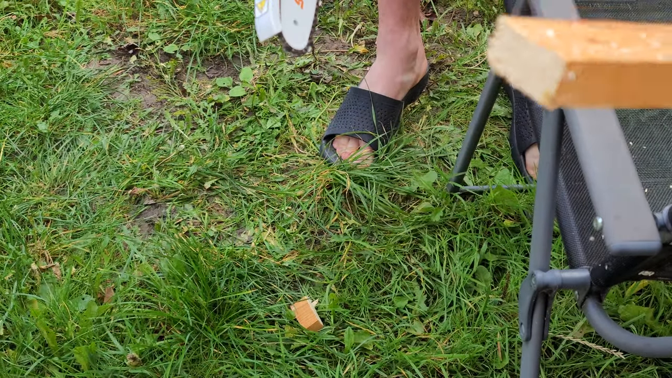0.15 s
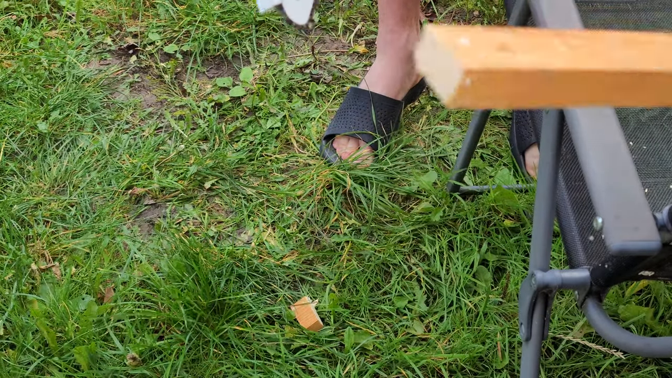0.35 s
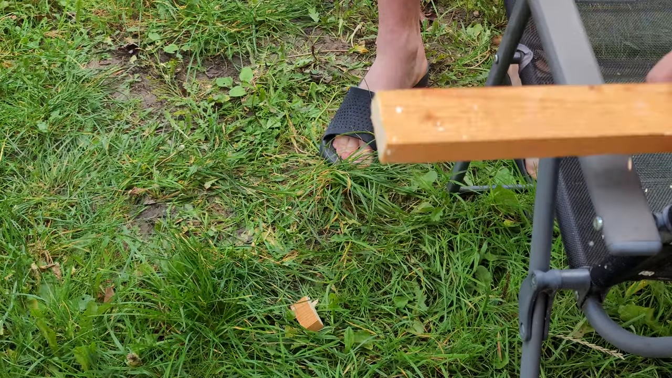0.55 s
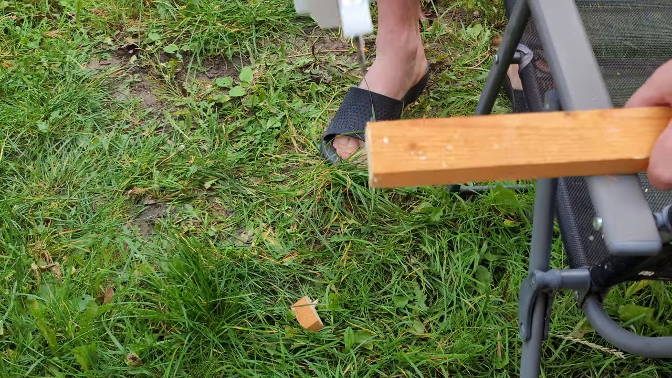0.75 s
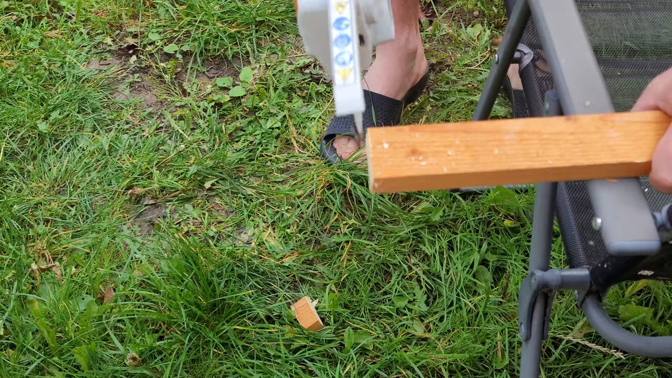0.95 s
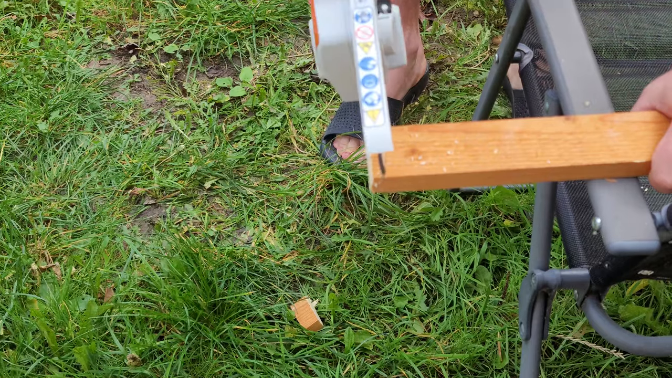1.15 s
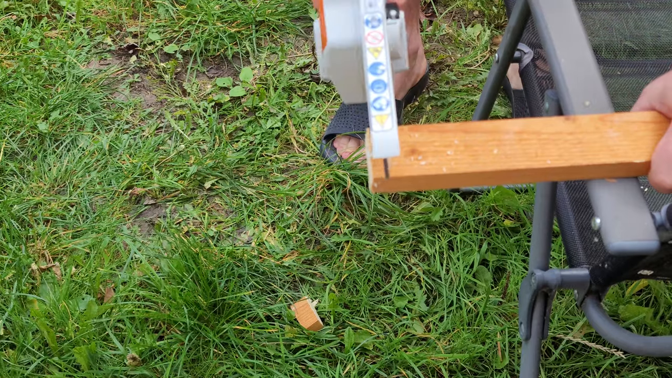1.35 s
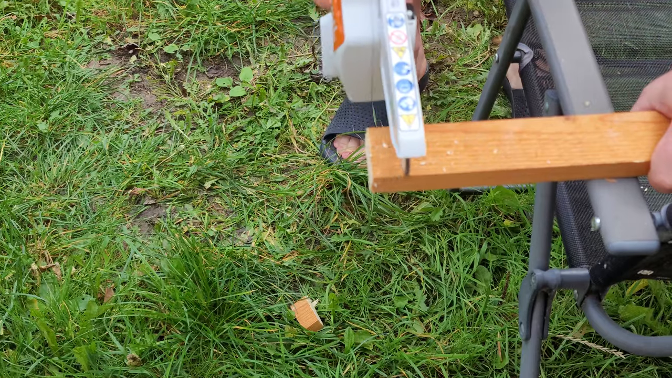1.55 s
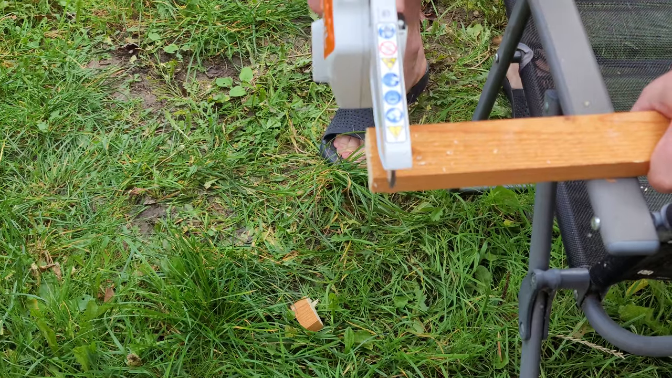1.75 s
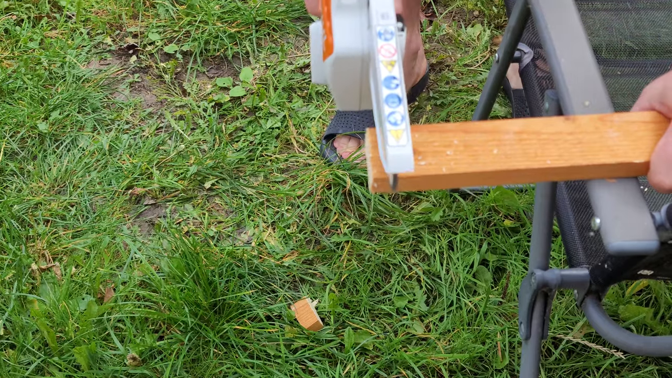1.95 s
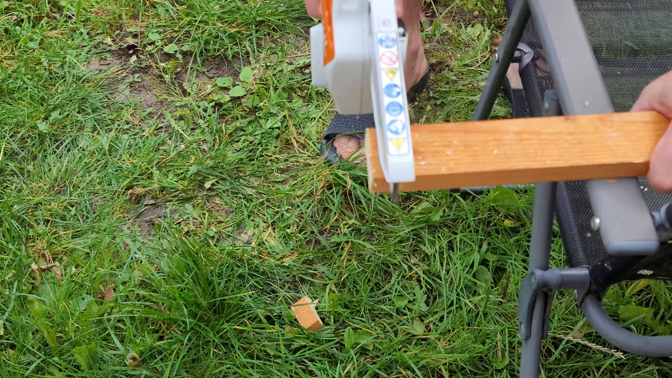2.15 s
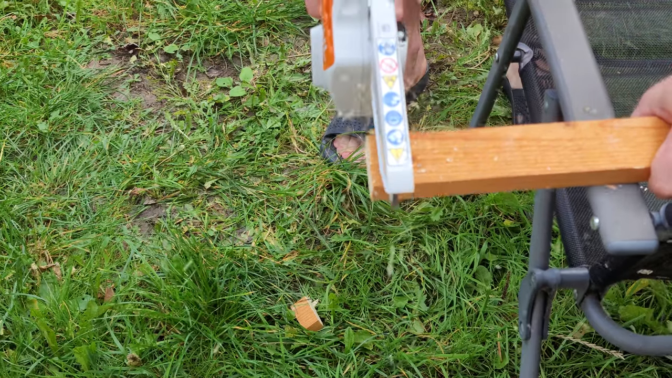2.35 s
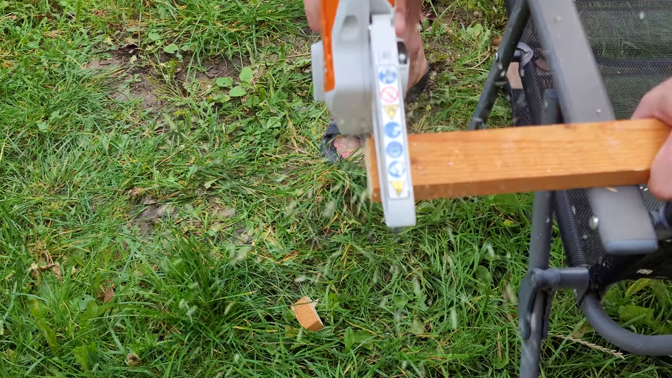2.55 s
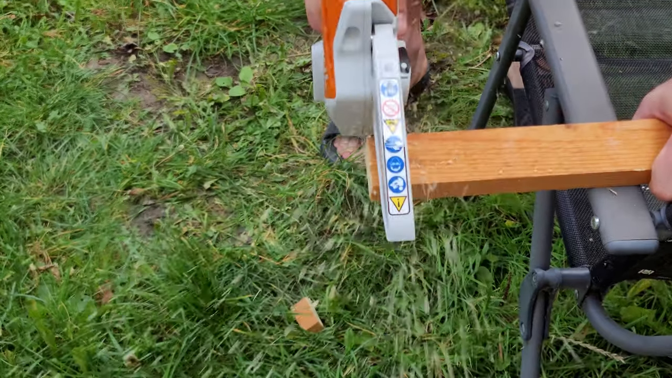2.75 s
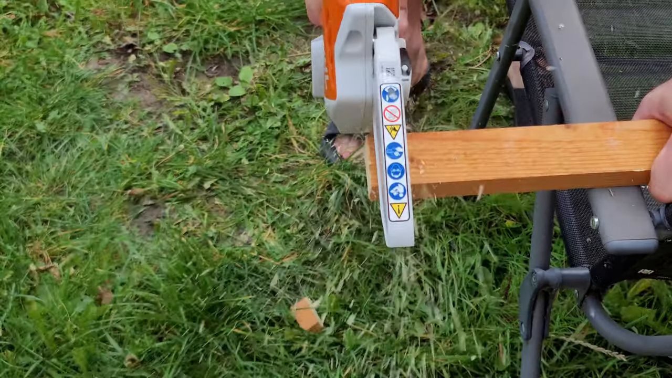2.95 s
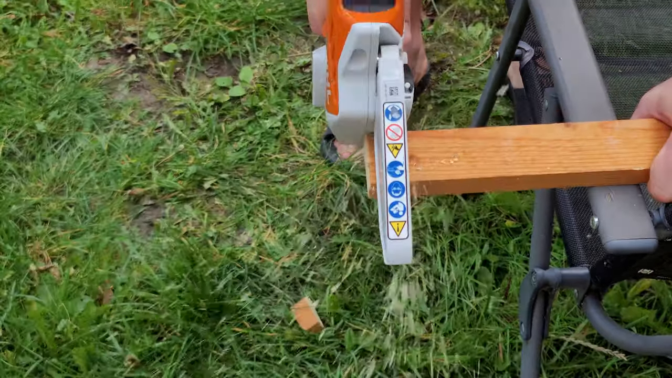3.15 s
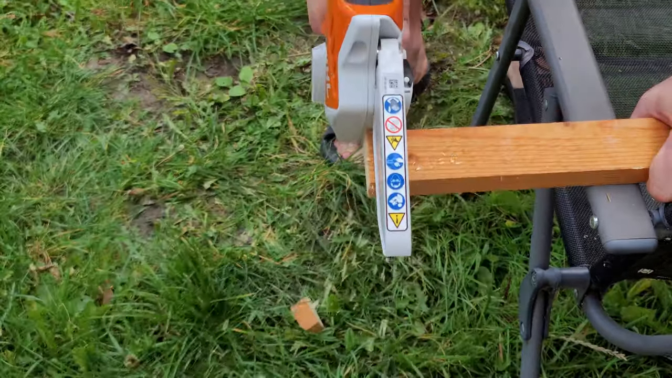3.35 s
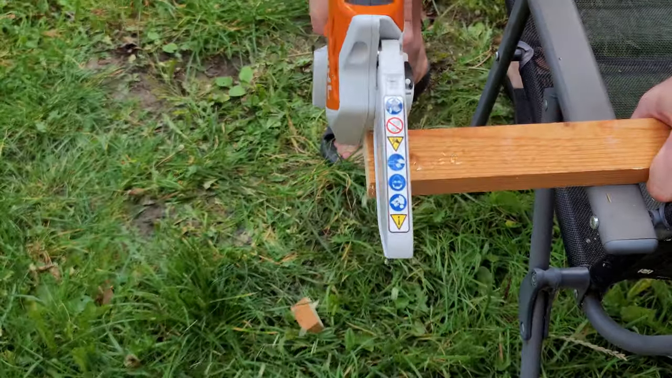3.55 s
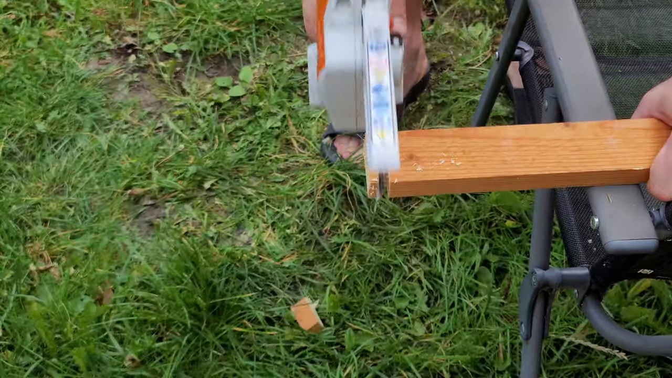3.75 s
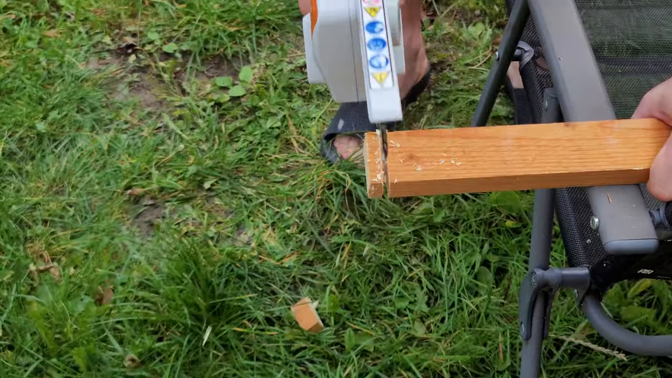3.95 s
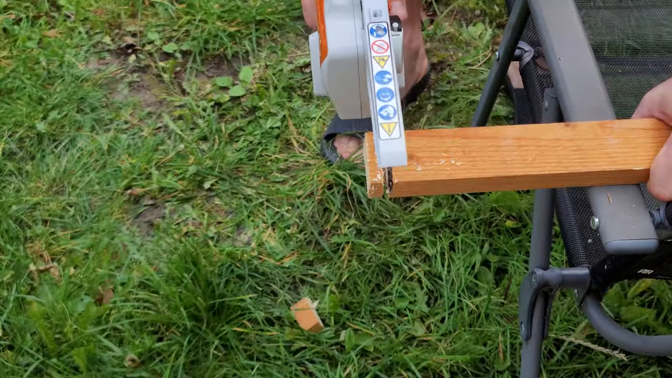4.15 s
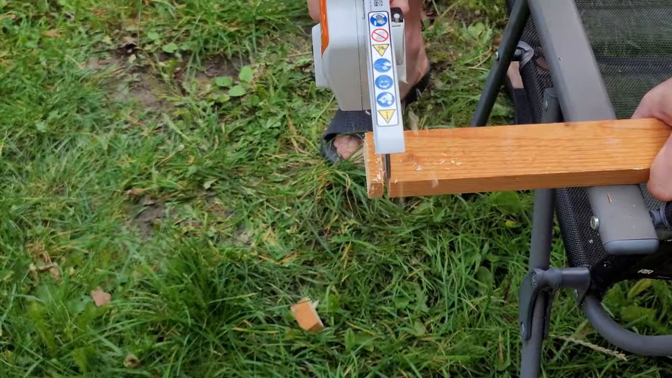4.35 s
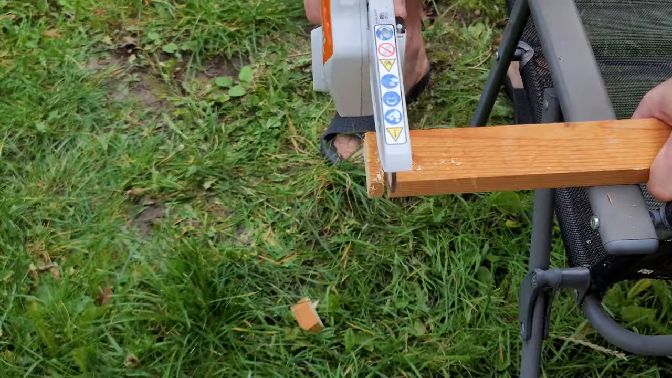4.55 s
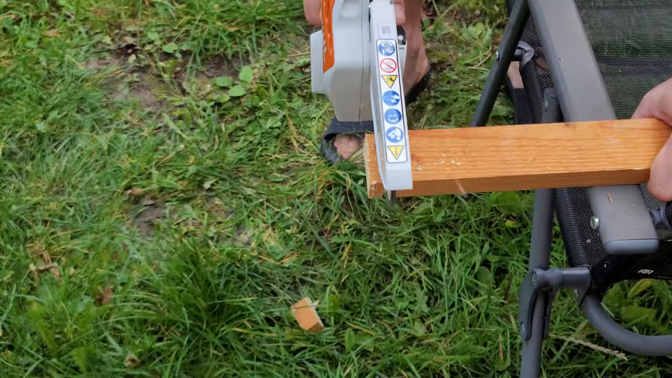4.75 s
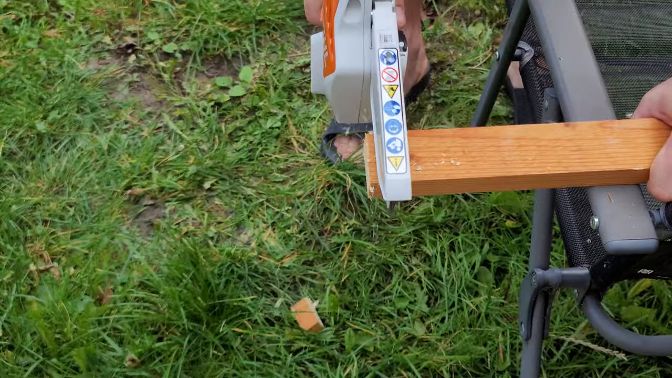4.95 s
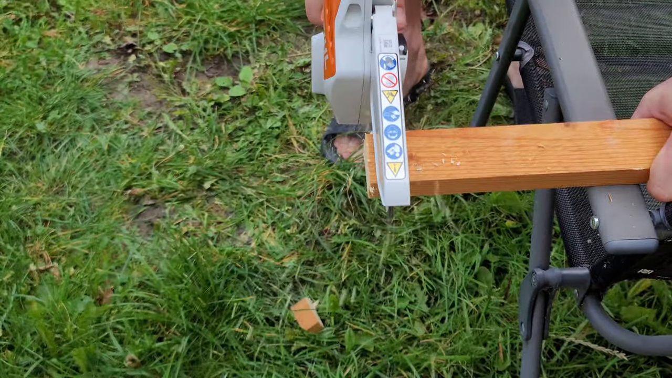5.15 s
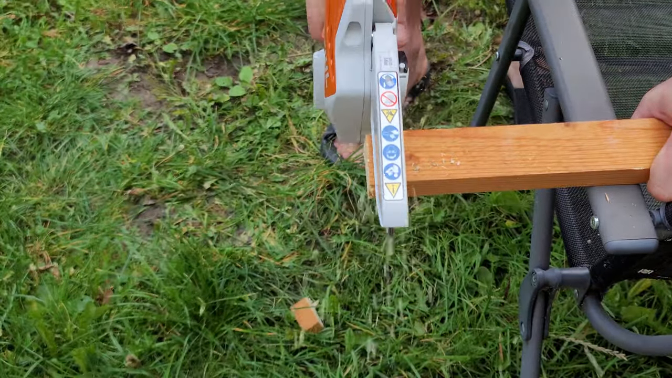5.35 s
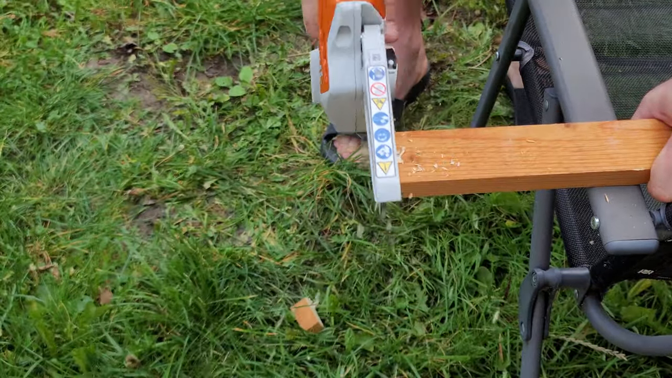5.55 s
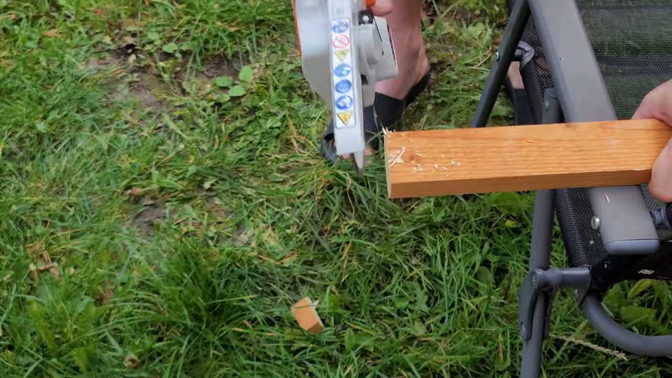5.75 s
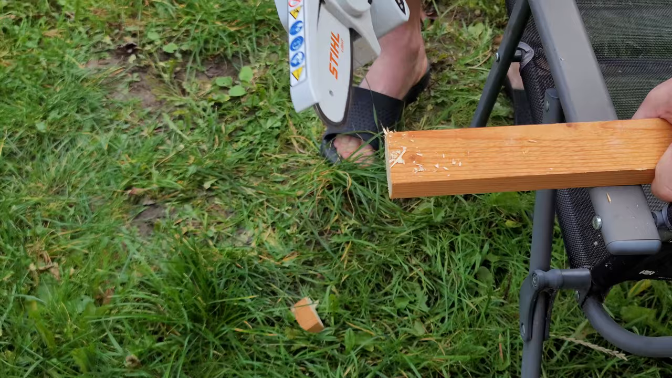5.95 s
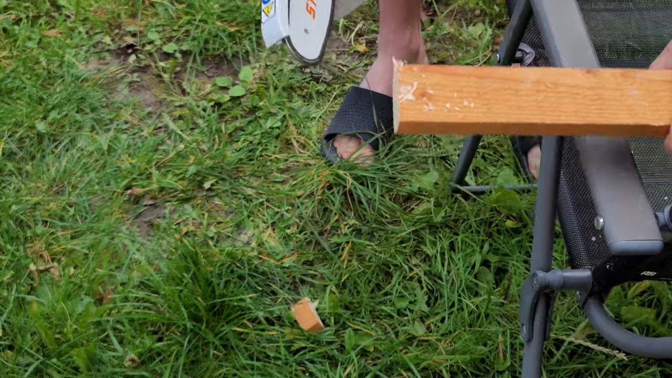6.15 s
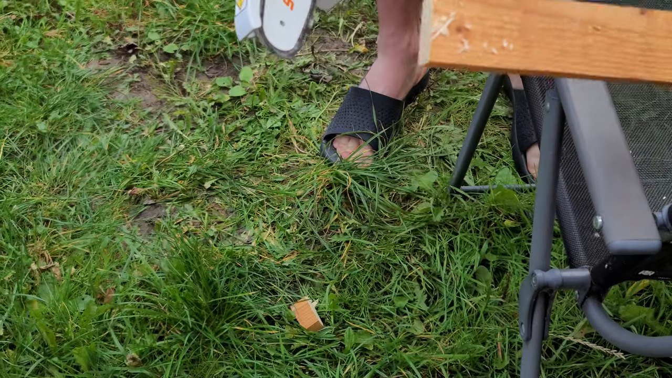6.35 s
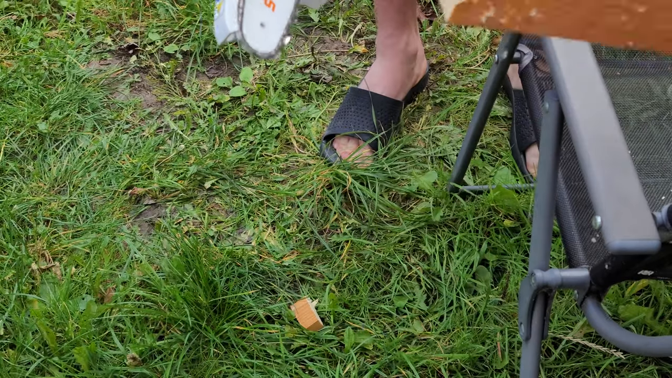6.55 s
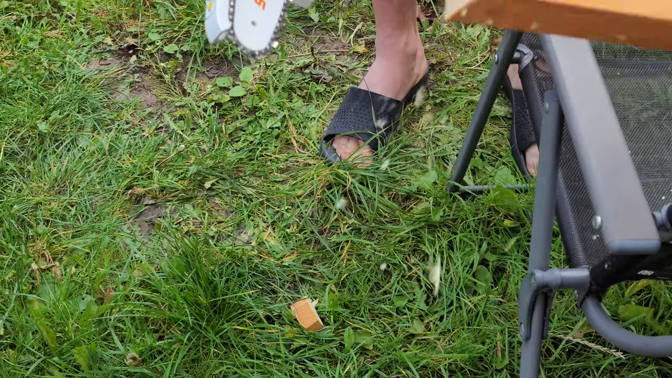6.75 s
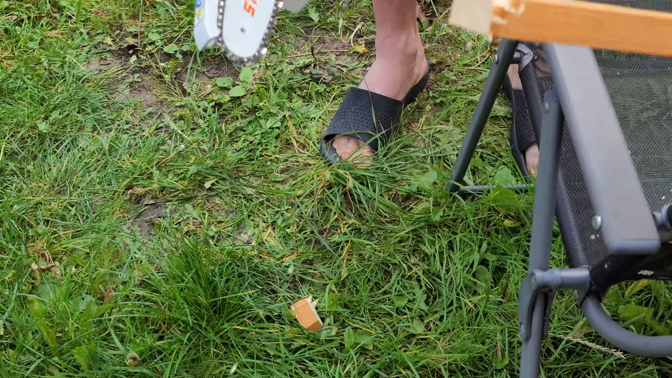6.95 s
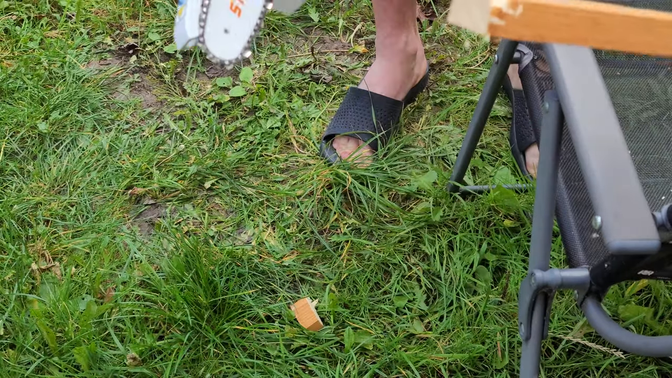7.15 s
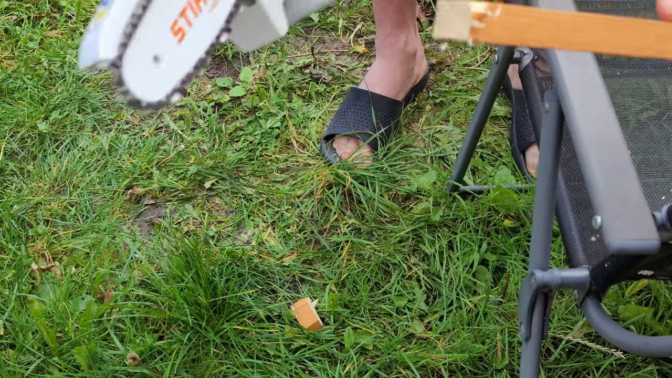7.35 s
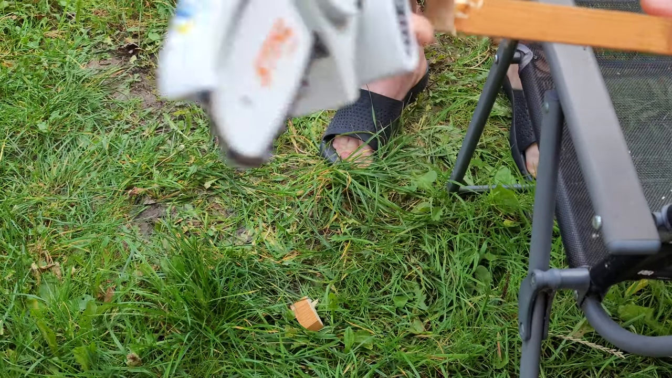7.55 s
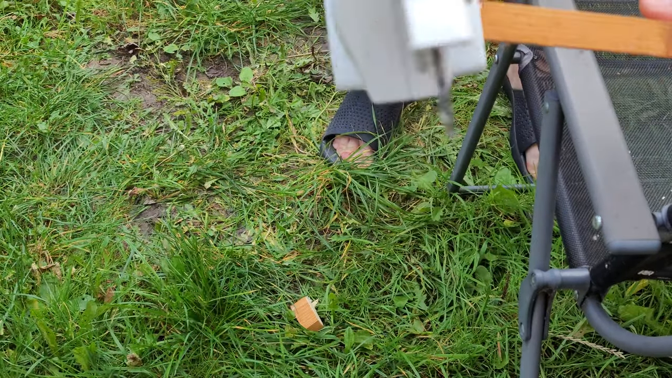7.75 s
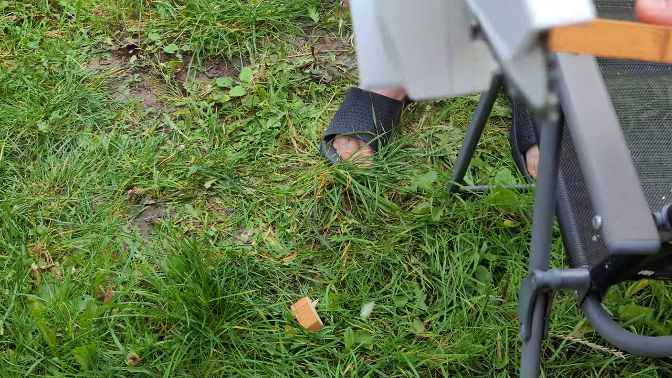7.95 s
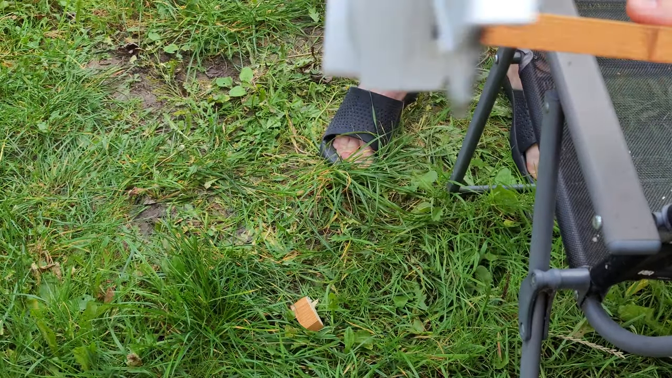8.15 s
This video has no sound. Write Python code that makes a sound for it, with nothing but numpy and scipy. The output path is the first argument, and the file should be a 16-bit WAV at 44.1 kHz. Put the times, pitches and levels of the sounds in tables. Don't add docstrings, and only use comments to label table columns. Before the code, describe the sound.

Over leafy hush and wind thumps, a battery saw buzzes, bogs down and stalls in wood, restarts in short touches, then rattles to a stop.

```python
import sys
import numpy as np
from scipy import signal
from scipy.fft import rfft, irfft, next_fast_len
from scipy.io import wavfile
from scipy.ndimage import uniform_filter1d, map_coordinates

SR = 44100
rng = np.random.default_rng(int(sys.argv[2]) if len(sys.argv) > 2 else 0)


def dump_mix(stems):
    frames = np.atleast_2d(stems).T
    limited = np.clip(frames, -1, 1)
    pcm = np.round(limited * 32767).astype(np.int16)
    wavfile.write(sys.argv[1], SR, pcm)


def boost(x):
    u = np.asarray(x, float) / 20
    return 10 ** u


N = 360738
TIME = np.arange(N) / SR


def unit(x):
    return x / np.sqrt(np.mean(x ** 2) + 1e-20)


def along(points, hz):
    f, v = np.transpose(points)
    return np.interp(np.log(hz + 1), np.log(f + 1), v)


def curve(rows):
    return np.interp(TIME, *np.transpose(rows))


def wobble(rate):
    coarse = np.arange(0, N + 64, 64)
    knots = rng.standard_normal(int(N * rate / SR) + 4)
    return np.interp(np.arange(N), coarse, map_coordinates(knots, [coarse * rate / SR]))


def bell(x, centre, width):
    return np.exp(-((x - centre) / width) ** 2)


def filtered(x, response):
    m = next_fast_len(N + SR // 2)
    return irfft(rfft(x, m) * response(np.fft.rfftfreq(m, 1 / SR)), m)[..., :N]


def spread(pair, spectrum, alike):
    def shares(hz):
        turn = np.arccos(np.clip(along(alike, hz), -1, 1)) / 2
        return spectrum(hz) * [np.cos(turn), np.sin(turn)]

    mid, side = filtered(pair, shares)
    return np.array([mid + side, mid - side])


def in_band(x, low_hz, high_hz, where):
    part = filtered(x.mean(axis=0), lambda hz: (hz > low_hz) & (hz < high_hz))
    return x / np.sqrt(np.mean(part[where] ** 2))


# (frequency [Hz], density [dB per Hz])
HUSH_COLOUR = [(25, -6), (48, 12), (80, -2.5), (150, -1.5), (300, -1.5), (600, -1.5), (900, -8.5),
               (1500, -7.5), (3000, -10.5), (6800, -9), (8500, -11), (9000, -21), (13000, -17.5),
               (16000, -27.5)]
# (frequency [Hz], likeness [-1 to 1])
HUSH_ALIKE = [(60, 1), (180, 1), (550, 0.059), (1650, -0.24), (4970, -0.027), (15000, 0.15)]
# (time [s], level [dB])
HUSH_LEVEL = [(0, -61), (1.05, -58), (3.33, -56.5), (3.6, -56.5), (3.8, -55), (4.15, -56), (6.6, -59),
              (7.3, -60.5), (8.18, -60)]


def hush():
    air = spread(rng.standard_normal((2, N)), lambda hz: boost(along(HUSH_COLOUR, hz)), HUSH_ALIKE)
    level = boost(curve(HUSH_LEVEL) + .7 * wobble(6))
    return level * in_band(air, 4000, 9000, slice(None))


# (time [s], length [s], start pitch [Hz], end pitch [Hz], level [dB])
BIRD_NOTES = [
    (7.257, 0.033, 4300, 4100, -60),
    (7.287, 0.034, 4200, 4350, -62),
    (7.313, 0.033, 2340, 2310, -53.5),
]


def bird():
    out = np.zeros(N)
    for s, length, hz, end_hz, db in BIRD_NOTES:
        u = np.clip((TIME - s) / length, 0, 4)
        swell = u ** .5 * np.exp(-1.6 * u) * (u < 4)
        cycles = length * (hz * u + (end_hz - hz) * u * u / 2)
        out += boost(db + 12.5 + 3.8 * wobble(150)) * swell * np.sin(2 * np.pi * cycles)
    return out


# (frequency [Hz], density [dB per Hz])
WIND_COLOUR = [(12, -33.5), (20, -8), (43, 6.5), (80, 4), (179, -21.5), (380, -32), (400, -31),
               (520, -61.5), (880, -120)]


def rumble():
    lumps = boost(7.6 * np.array([wobble(25), wobble(22)]))
    out = filtered(rng.standard_normal((2, N)) * lumps, lambda hz: boost(along(WIND_COLOUR, hz)))
    return out / np.sqrt(uniform_filter1d(out ** 2, size=SR // 12) + 1e-12)


# (time [s], level [dB])
LULL = [(0, -60), (.9, -52), (1.5, -61), (1.9, -60), (2.6, -65), (2.8, -51), (3.5, -47), (4, -55), (5, -50),
        (5.15, -69), (5.6, -52), (6, -57), (6.5, -55), (6.95, -65), (8.18, -61)]
# (time [s], peak level [dB], left over right [dB], time to swell or fall 20 dB [s])
GUSTS = [(.13, -32, -30, 0.12), (.25, -34, -31, 0.15), (.63, -35, -28, .08), (.73, -33, -25, 0.1),
         (.93, -28.5, -35, 0.14), (1.069, -38, -29, 0.1), (1.25, -38, -21, 0.05), (1.39, -32.5, -33, 0.09),
         (1.53, -41.5, -20, 0.17), (2.14, -39, -15, 0.03), (2.73, -26.5, -32, 0.05), (2.89, -31, -25, 0.1),
         (3.14, -30, -27, 0.09), (3.51, -37, -14.5, 0.1), (3.87, -39.5, -9, 0.18), (4.01, -60, -16, 0.8),
         (4.149, -33.5, 7, 0.04), (4.27, -40, -7, 0.13), (4.44, -32, -26, 0.06), (4.67, -32, 8, 0.08),
         (4.8, -39, 15, 0.1), (4.9, -36, -15, 0.13), (5.47, -35.5, -27, 0.23), (6.06, -31.5, -1, 0.02),
         (6.24, -37.5, -27, 0.11), (6.47, -49, 17, 0.2), (6.79, -47, 15, 0.1), (7.5, -47, 9, 0.1)]


def gust_level():
    step = TIME[::64]
    level = boost(np.interp(step, *np.transpose(LULL)) - 4.5) * np.ones((2, 1))
    for s, db, pan_db, swell in GUSTS:
        balance = np.array([[boost(pan_db)], [1]]) / np.sqrt(1 + boost(2 * pan_db))
        level = level + boost(db - 20 * np.abs(step - s) / swell) * balance
    return boost(3.5) * np.array([np.interp(TIME, step, port) for port in level])


# (time [s], peak level [dB])
POPS = [
    (0.108, -25),
    (0.864, -33),
    (0.933, -39),
    (1.383, -29.5),
    (4.439, -37),
    (5.418, -31),
    (5.759, -46),
    (6.07, -58),
]


def pops():
    out = np.zeros(N)
    for s, db in POPS:
        u = (TIME - s - .004) / 0.0014
        out -= boost(db + 10.0) * u * np.exp(-u * u / 2)
    return out


def wind():
    return gust_level() * rumble() + np.array([np.zeros(N), pops()])


def add(out, s, db, hz, t60, rustle, rustle_hz, rough=0.76):
    t = np.arange(SR // 5) / SR
    noise = rng.standard_normal((3, len(t)))
    band = signal.butter(2, [rustle_hz / 2, min(rustle_hz * 2, 18000)], "band", fs=SR)
    puff = unit(signal.lfilter(*band, noise[0] + 2.2 * noise[1:]))
    ring = np.sin(2 * np.pi * hz * t + rough * unit(uniform_filter1d(noise[0], size=90)))
    hit = 0.64 * ring * boost(-60 * t / t60) + 0.34 * puff * boost(-30 * t / rustle)
    out[:, round(s * SR):][:, :len(t)] += boost(db) * hit * (1 - np.exp(-t / 0.001))


# (time [s], peak level [dB], ring [Hz], ring t60 [s], rustle [s])
KNOCKS = [(.688, -26.5, 890, 0.045, 0.076), (.689, -33.5, 170, 0.16, .021), (.697, -33, 1730, 0.062, 0.022),
          (.689, -35, 523, 0.055, .01), (.716, -33, 1890, 0.046, 0.044), (.73, -35.5, 990, .05, 0.044),
          (1.18, -18, 2210, .23, 0.0092), (3.628, -36.5, 5900, .02, 0.12),
          (3.678, -27.5, 765, 0.017, 0.063), (3.679, -36.5, 184, 0.1, .01),
          (3.68, -32.5, 6470, 0.039, 0.036), (6.533, -35, 713, .071, 0.037),
          (6.536, -34, 1900, 0.031, 0.11), (6.538, -32, 505, 0.16, 0.015), (6.534, -36, 1270, 0.046, .04),
          (6.54, -34, 2270, 0.032, .04), (6.748, -43.5, 557, 0.18, .006), (7.85, -46, 1500, .02, .12),
          (8.088, -37, 3000, 0.005, 0.036), (4.812, -28, 283, 0.23, .01), (4.812, -26, 560, 0.2, .01),
          (5.305, -24, 211, 0.071, .01), (8.085, -43, 1370, .03, .02), (2.07, -34.5, 215, .2, .01),
          (2.13, -33, 309.2, .2, .01), (3.17, -27, 600, .08, .03), (3.2, -32, 398, 0.088, .02),
          (5.45, -28.5, 680, .1, .01), (3.245, -35, 230, .1, .02), (3.26, -34, 480, .08, .02),
          (5.33, -27, 510, .08, .01)]


def knocks(out):
    for s, db, hz, t60, rustle in KNOCKS:
        add(out, s, db, hz, t60, rustle, max(hz, 1260), rough=min(hz / 1500, .67))


# (time [s], peak level [dB], ring [Hz])
TICKS = [(6.367, -29, 8000), (6.422, -26, 9000), (6.468, -32, 7900), (6.54, -35, 4460), (6.54, -35, 7000),
         (6.61, -39, 2800), (6.62, -42, 1200), (6.683, -36, 3020), (6.695, -41, 1200), (.689, -34, 3800),
         (8.0855, -31, 12000), (8.0855, -32, 4900), (8.0855, -36, 8000), (8.0898, -38, 6500),
         (8.094, -40, 12500), (8.094, -42, 4000), (5.449, -14, 3190), (6.152, -30, 2800), (6.39, -38, 2300),
         (1.172, -30, 3980), (5.63, -22, 1980), (6.195, -33, 7000), (5.565, -20, 5600), (6.535, -30, 10000)]


def ticks(out):
    for s, db, hz in TICKS:
        add(out, s, db, hz, min(60 / hz, .03), .008, hz)


# (time [s], peak level [dB], ring [Hz])
LINKS_LAST = [(5.8178, -22, 1330), (5.9361, -20, 1720), (6.0074, -26, 1740), (6.0328, -29, 2100),
              (6.0543, -26, 2130), (6.1112, -24, 1690), (6.1411, -33, 1150), (6.185, -38, 1210),
              (6.2035, -33, 2520), (6.2484, -35, 1130), (6.2908, -37, 1150), (6.3387, -38, 2660),
              (6.3571, -37, 1160), (6.423, -44, 2290), (6.4559, -42, 2270), (6.5063, -43, 3000)]


def last_links(out):
    for s, db, hz in LINKS_LAST:
        add(out, s, db - 1.5, hz, .035, .006, 2600)


# (pulled [s], let go [s])
TRIGGER = [
    (1.08, 3.11),
    (4.166, 5.55),
]


def trigger_clicks(out):
    for s, _ in TRIGGER:
        add(out, s - .006, -39, 1600, .06, .002, 1600, rough=.2)


# (time [s], peak level [dB], ring [Hz])
SNAGS = [(3.083, -14, 984), (3.112, -11.5, 1120), (3.138, -7.5, 1150), (3.15, -11.5, 1163),
         (3.195, -24, 1170), (3.232, -27, 1300), (3.253, -24, 1470), (4.686, -19, 2900), (4.799, -16, 2780),
         (4.826, -17, 2720), (4.956, -16, 2800), (5.116, -14, 2030), (4.677, -15, 1350), (4.795, -13, 1720),
         (5.311, -9, 1466), (5.449, -15, 1960)]


def snags(out):
    for s, db, hz in SNAGS:
        add(out, s, db + 0.5, hz, .05, .01, 2500)


def bumps():
    out = np.zeros((2, N + SR))
    for strike in (knocks, ticks, last_links, trigger_clicks, snags):
        strike(out)
    return out[:, :N]


def spin_up():
    since = np.clip(TIME - np.where(TIME < 4, TRIGGER[0][0], TRIGGER[1][0]), 0, None)
    rise_s, shape = .1446, 1.71
    return 1 - np.exp(-(since / rise_s) ** shape)


# (time [s], speed [Hz])
SPEED = [
    [(1.95, 302), (2.17, 290), (2.35, 254), (2.65, 220), (2.9, 200), (2.96, 178), (3.15, 115), (3.27, 58),
     (3.31, 12)],
    [(4.68, 302), (4.83, 284), (5.3, 246), (5.42, 280), (5.52, 300), (5.6, 280), (5.8, 190), (6.1, 103),
     (6.52, 24)],
]


def shaft_speed(spin):
    first, second = (curve(rows) for rows in SPEED)
    return spin * np.where(TIME < 4, first, second) + 1


# (time [s], push [share of full bite])
PRESSURE = [
    [(1.8, 0.059), (2.0, 0.21), (2.18, 0.56), (2.25, 0.86), (2.73, 1.06), (3.02, 0.95), (3.1, 0.79),
     (3.16, 0.33), (3.22, 0.11), (3.27, 0.078), (3.29, 0.04)],
    [(4.5, 0), (4.81, 0.05), (4.83, 0.35), (4.89, 0.37), (5.01, 0.44), (5.17, 0.67), (5.195, 0.31),
     (5.28, 0.46), (5.355, 0.44), (5.37, 0)],
]
# (time [s], push [share of full bite], decay [s])
TOUCHES = [(3.258, 0.12, 0.023), (4.682, 0.51, 0.041), (4.797, 0.41, 0.0086), (4.826, 0.39, .035),
           (4.915, 0.27, 0.022), (4.958, 0.55, 0.023), (5.075, .25, .02), (5.12, 0.56, .02),
           (5.232, 0.42, .03), (5.312, .8, 0.013), (5.336, 0.26, 0.014), (5.448, 0.4, 0.045),
           (5.565, 0.099, .015)]


def board_push(spin):
    first, second = (curve(rows) for rows in PRESSURE)
    push = np.abs(np.where(TIME < 3.31, first, second)) * spin ** 2
    for s, share, decay in TOUCHES:
        push = push + share * np.exp(-np.abs(TIME - s) / np.where(TIME > s, decay, 0.011))
    return push


FREE_HZ = 302
AWAY_S = 5.37


def chain_level(shaft, power, push, decades):
    driven_db, coasting_db = 15, 24.5
    db = -28 + (driven_db * power + coasting_db * (1 - power)) * decades
    db = db + 4.5 * np.minimum(push / 0.58, 1) - 2 * (TIME > AWAY_S)
    slack_hz, taut_hz = 10, 17
    return db + 20 * np.log10(np.clip((shaft - slack_hz * power) / taut_hz, .03, 1))


BITE_DB = -20


def bite_level(shaft, spin, power, push, decades, hiss_db):
    rattle = boost(-38.5) * np.clip(spin - .15, 0, 1) * np.clip((1 - spin) / .1, 0, 1)
    slowing = np.clip(-3 * decades, 0, 1) * np.clip((shaft - 60) / 40, 0, 1)
    return boost(BITE_DB) * push + rattle + boost(hiss_db - 6) * (1 - power) * slowing


# (frequency [Hz], width [Hz], peak gain [dB])
CASING = [(1150, 100, 2.5), (1420, 70, 8), (1895, 150, 5), (2340, 80, 3), (2690, 80, 3), (3950, 200, 4),
          (4280, 110, 4.5), (5350, 120, 2), (6800, 450, 4), (8550, 400, 4)]


def casing(hz):
    return 1 + sum((boost(db) - 1) / (1 + (2 * (hz - c) / w) ** 2) for c, w, db in CASING)


# (frequency [Hz], likeness [-1 to 1])
SAW_ALIKE = [(60, 0.56), (200, 1), (640, 0.5), (1400, 0.54), (3000, 0.23), (6000, 0.39), (15000, 0.17)]


def through_saw(pair, table, low_hz, high_hz, on):
    return in_band(spread(pair, lambda hz: boost(along(table, hz)) * casing(hz), SAW_ALIKE), low_hz, high_hz, on)


def strikes(rate, scatter, size_db, burst_s, bed, even):
    turns = np.cumsum(rate) / SR
    count = np.arange(1, int(turns[-1]))
    chance = rng.standard_normal((len(count), 2))
    at = np.searchsorted(turns, count + scatter * chance[:, 0]).clip(0, N - 1)
    hits = np.bincount(at, boost(size_db * chance[:, 1]), N)
    gate = signal.lfilter([1], [1, -np.exp(-1 / (burst_s * SR))], hits)
    gate /= np.sqrt(uniform_filter1d(gate ** 2, size=SR // 20) + 0.0015)
    return (bed + even + (1 - even) * gate) * rng.standard_normal((2, N))


def patchy(pair, depth_db):
    z = signal.stft(pair, nperseg=512)[2]
    field = uniform_filter1d(rng.standard_normal(z.shape[1:]), size=3, axis=0)
    field = uniform_filter1d(field, size=12, axis=1)
    return signal.istft(z * boost(depth_db * unit(field)), nperseg=512)[1][:, :N]


# (frequency [Hz], density [dB per Hz])
CHAIN = [(100, -59.5), (250, -44), (450, -20), (680, -19.5), (820, -10), (1050, -6.5), (1700, -4.5),
         (3300, -4.5), (4400, -9), (5500, -7), (7000, -5.5), (7700, -9), (12000, -10.5), (16000, -14.5)]
# (frequency [Hz], density [dB per Hz])
COAST = [(290, -46), (500, -14), (1000, -17), (1160, -4), (1460, -17), (1790, -4.5), (1950, -4), (3200, -3),
         (4340, -15.5), (6000, -6), (6900, -5.5), (9360, -13), (10800, -11), (16000, -16)]
# (frequency [Hz], density [dB per Hz])
WAKING = [(500, -40), (900, -8), (1500, -9.5), (2200, -3), (3100, -3), (4000, -1), (4500, -13.5),
          (5600, -12), (7000, -8.5), (15800, -17.5)]


def chain_clatter(shaft, links, crawl, waking, on):
    sparse = np.clip((110 - shaft) / 50, 0, 1) * (TIME > 5.5)
    bed = 1.6 + .2 * crawl - 1.1 * sparse
    clatter = strikes(3 * links + 100 * on, scatter=.5, size_db=3, burst_s=.001, bed=bed, even=waking)
    clatter = patchy(clatter, depth_db=1.5)
    fast, slow, early = (through_saw(clatter, table, 4000, 15000, on) for table in (CHAIN, COAST, WAKING))
    return (1 - crawl - waking) * fast + crawl * slow + 0.81 * waking * early


# (frequency [Hz], density [dB per Hz])
BITE = [(350, -48), (600, -33), (771, -11), (891, -12), (1410, -3.5), (1540, -10), (1960, -6), (2140, -3),
        (5040, -18), (6000, -11), (7800, -43), (13200, -120)]
# (frequency [Hz], density [dB per Hz])
STALL = [(350, -18), (600, -25), (627, -36), (927, -7.5), (1000, -6), (1150, -0.5), (1520, -13),
         (2270, -9.5), (5000, -21.5), (6500, -56), (11000, -120)]
# (frequency [Hz], density [dB per Hz])
BOARD = [(76, -50.5), (130, -10.5), (232, -11), (383, -10.5), (432, 1.5), (632, -3.5), (800, 6.5),
         (1040, -30), (1760, -120)]


def wood_cut(links, crawl, waking, on):
    teeth = strikes(links + 40 * on, scatter=.3, size_db=3.5, burst_s=.0025, bed=1, even=waking)
    teeth = patchy(teeth, depth_db=2.1)
    bogged = crawl * np.where(TIME < 4, 1, .7)
    cut = np.sqrt(1 - bogged) * through_saw(teeth, BITE, 700, 3500, on)
    cut = cut + np.sqrt(bogged) * through_saw(np.roll(teeth, 900, axis=1), STALL, 700, 3500, on)
    thud = through_saw(np.roll(teeth, -900, axis=1), BOARD, 250, 700, on)
    return cut, thud


# (frequency [Hz], width [Hz], level re bite [dB], shaft speed [Hz], speed span [Hz])
SWELLS = [(5350, 250, -12, 260, 27), (2800, 400, -6.5, 216, 14), (3590, 380, -8, 226, 11),
          (1270, 130, -5, 195, 22), (6230, 370, -13, 197, 18), (1422, 35, -4, 265, 30),
          (1386, 40, -6.5, 205, 13), (4200, 150, -16, 160, 30), (8550, 330, -13, 265, 27),
          (1885, 90, -6, 270, 28), (1990, 300, -3, 180, 15), (1225, 99, -5, 170, 20),
          (1150, 54, -1, 120, 19)]


def bar_ring(shaft, power, bite):
    fast = np.clip(shaft / FREE_HZ, 0, 1) ** 4
    ring = bite * fast * boost(-27 - BITE_DB) * wobble(70) * np.sin(2 * np.pi * 4256 * TIME)
    modes = 0
    for hz, width, db, at_hz, span_hz in SWELLS:
        modes = modes + boost(db) * bell(shaft, at_hz, span_hz) * wobble(width) * np.sin(2 * np.pi * hz * TIME)
    second_db = -10 * (TIME > 4)
    return ring + bite * power * boost(second_db) * modes


def tone(turn, k, jitter):
    return np.sqrt(2) * np.sin(k * turn + jitter * wobble(25)) * boost(1.5 * wobble(12))


LINKS_PER_TURN = .6274
# (multiple of link rate, level re hiss [dB])
LINK_TONES = [(2, -37), (3, -25.5), (4, -21.5), (5, -36), (6, -17), (7.5, -27), (9, -15.5), (10, -12.5),
              (11, -12.5), (11.5, -20), (12, -14), (13, -17.5), (15, -37), (19.5, -19.5)]
AWAY_TONES = {3: 2, 4: -10, 5: -6, 6: 3}
# (multiple of shaft rate, level re hiss [dB])
SHAFT_TONES = [(4, -17.5), (5, -33)]


def chain_tones(shaft, turn, hiss):
    steady = np.clip(shaft / 300, 0, 1) ** 1.8 * np.interp(TIME, [5.3, 5.6], [1, .9])
    tones = 0
    for k, db in LINK_TONES:
        level = boost(db + AWAY_TONES.get(k, 0) * (TIME > AWAY_S))
        tones = tones + level * tone(turn, k * LINKS_PER_TURN, 0.25)
    for k, db in SHAFT_TONES:
        tones = tones + boost(db) * tone(turn, k, 0.28)
    return hiss * steady * tones


def motor_hum(shaft, turn, push, decades):
    loaded = boost(-45) * bell(shaft, 175, 45) + boost(-37) * bell(shaft, 205, 18)
    level = boost(-58 + 54 * decades - 5 * (TIME > AWAY_S)) + push * loaded
    return level * boost(2.5 * wobble(30)) * (tone(turn, 0.99, .8) + boost(-6) * tone(turn, 2, .8))


# (frequency [Hz], width [Hz], level [dB])
WHINE_MODES = [(1150, 330, -1), (2450, 560, 4), (3900, 300, 0)]


def motor_whine(shaft, turn, spin, power, push, decades):
    start = np.clip((1 - spin) / .1, 0, 1) * sum(boost(db) * bell(16 * shaft, hz, w) for hz, w, db in WHINE_MODES)
    level = boost(-47 + 60 * decades) * (0.37 + 1.2 * power) / (1 + 1.5 * push) + boost(-36) * start
    level = level + push * power * boost(-32) * bell(shaft, 208, 25) * wobble(260)
    mesh = np.sqrt(2) * np.sin(16 * turn + 2 * wobble(25) + .4 * wobble(300))
    for k, share in ((32, 1), (48, .6)):
        mesh = mesh + share * bell(k * shaft, 3500, 750) * tone(turn, k, 3)
    return level * boost(1.3 * wobble(70) + 2 * wobble(140) + 2.5 * wobble(600)) * mesh


# (start [s], end [s])
SPANS = [
    (1.08, 3.295),
    (4.17, 6.52),
]
# (frequency [Hz], left over right [dB])
SAW_PAN = [(60, -8.0), (99, -7.0), (160, 0), (270, -0.5), (450, -1), (740, -3.5), (1220, 1), (2010, -1),
           (3330, 0.5), (5500, -4), (9080, 1.0), (15000, -4)]
# (frequency [Hz], lead of the left port [radians])
SAW_LEAD = [(0, -1.5), (1890, 0.22), (2500, 5), (2930, -0.53), (4220, -0.3), (8180, 1.5), (8870, 0.5),
            (16600, -1.5)]


def saw():
    spin = spin_up()
    shaft = shaft_speed(spin)
    power = uniform_filter1d(1. * sum((TIME > a) & (TIME < b) for a, b in TRIGGER), size=2000)
    push = board_push(spin)
    decades = np.log10(shaft / FREE_HZ)
    hiss_db = chain_level(shaft, power, push, decades)
    bite = bite_level(shaft, spin, power, push, decades, hiss_db)
    on = sum((TIME > a) & (TIME < b) for a, b in SPANS) > 0
    links = LINKS_PER_TURN * shaft * on
    hiss = boost(hiss_db + 0.4 * wobble(30))
    crawl = np.clip((200 - shaft) / 70, 0, 1) * ((TIME > 2) & (TIME < 4) | (TIME > 5.5))
    waking = np.clip((230 - shaft) / 110, 0, 1) * ((TIME < 2) | (TIME > 4) & (TIME < 4.6))
    cut, thud = wood_cut(links, crawl, waking, on)
    turn = 2 * np.pi * np.cumsum(shaft) / SR
    mix = hiss * chain_clatter(shaft, links, crawl, waking, on)
    mix = mix + bite * cut + boost(-35.5) * push ** 1.02 * thud
    mix = mix + chain_tones(shaft, turn, hiss) + motor_hum(shaft, turn, push, decades)
    mix = mix + motor_whine(shaft, turn, spin, power, push, decades) + bar_ring(shaft, power, bite)

    def ports(hz):
        level = boost(np.outer([.5, -.5], along(SAW_PAN, hz)))
        return level * np.exp(1j * np.outer([.5, -.5], along(SAW_LEAD, hz)))

    return filtered(mix * uniform_filter1d(1. * on, size=600), ports)


def scene():
    return hush() + bird() + wind() + bumps() + saw()


def band_limit(x):
    return signal.sosfilt(signal.butter(12, 17060, fs=SR, output="sos"), x)


def record(dry):
    soft = dry / (1 + np.abs(dry / .9) ** 4) ** (1 / 4)
    top_hz = 15890
    return band_limit(filtered(soft, lambda hz: hz < top_hz))


dry = scene()
out = record(dry)
dump_mix(out)
```